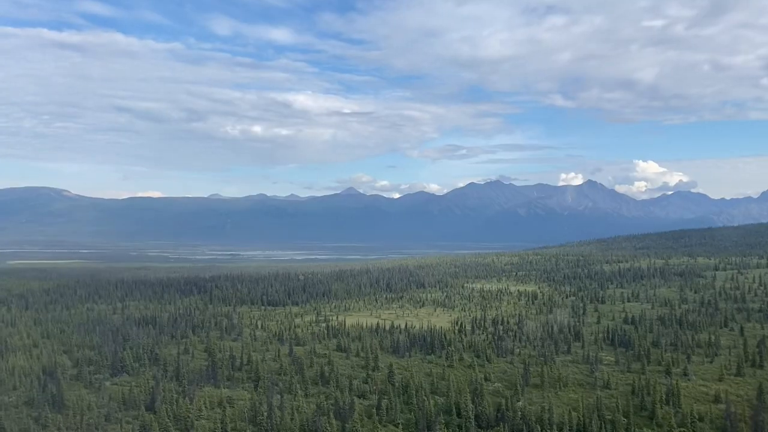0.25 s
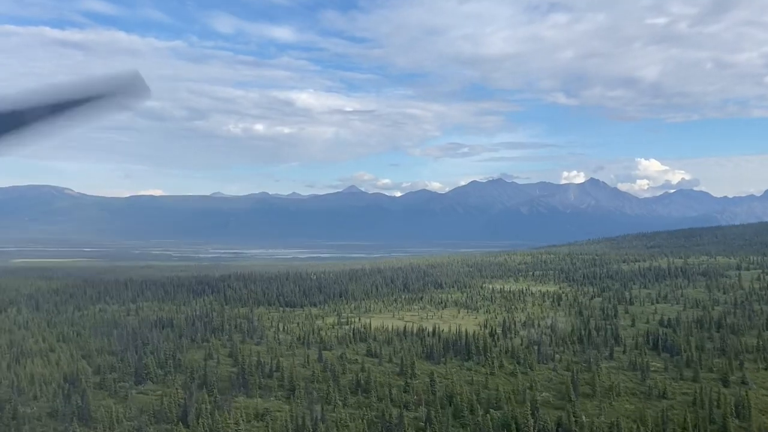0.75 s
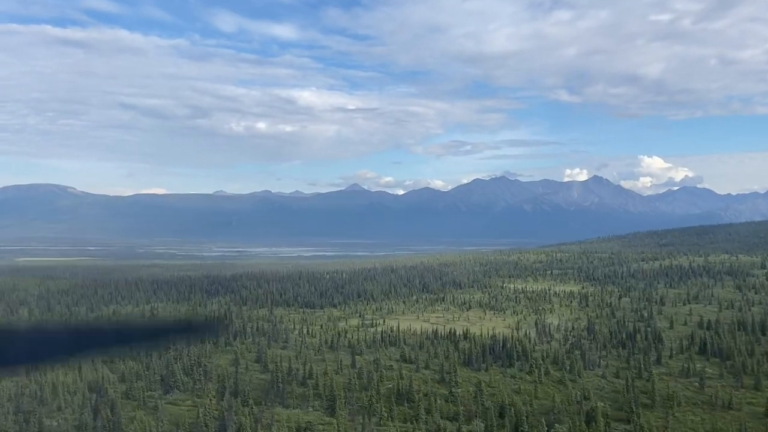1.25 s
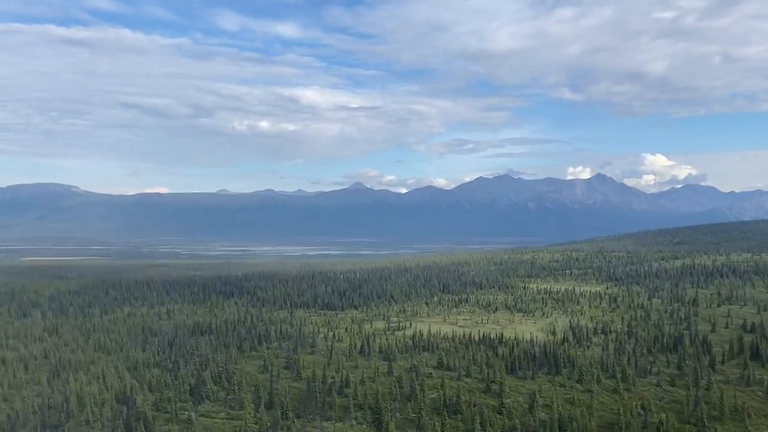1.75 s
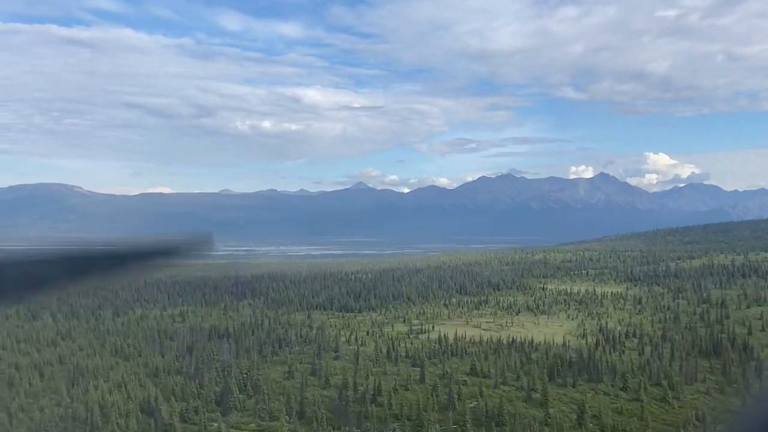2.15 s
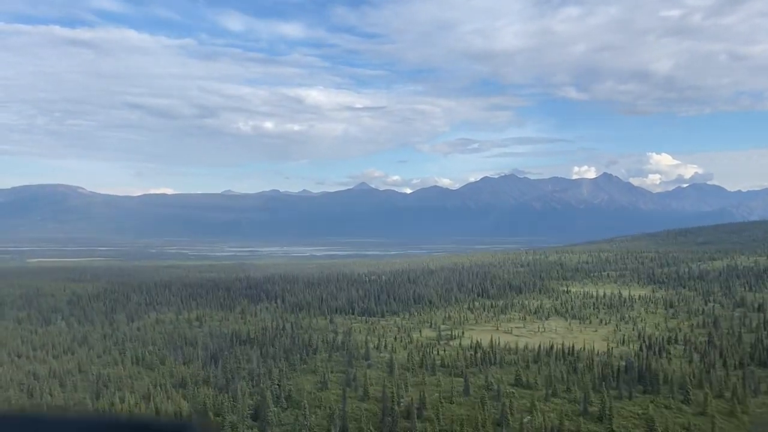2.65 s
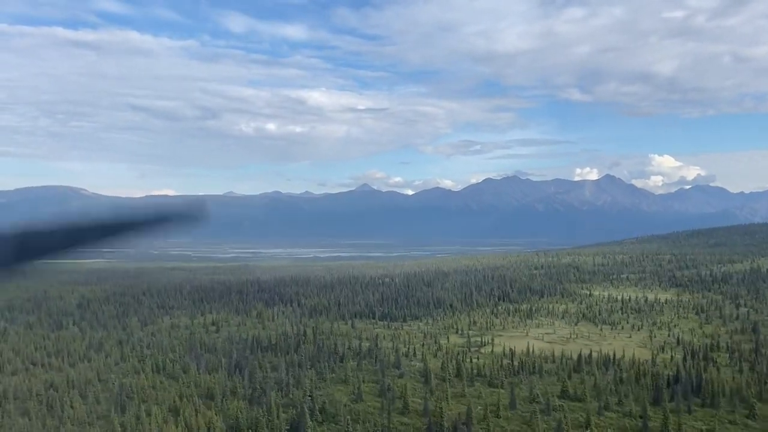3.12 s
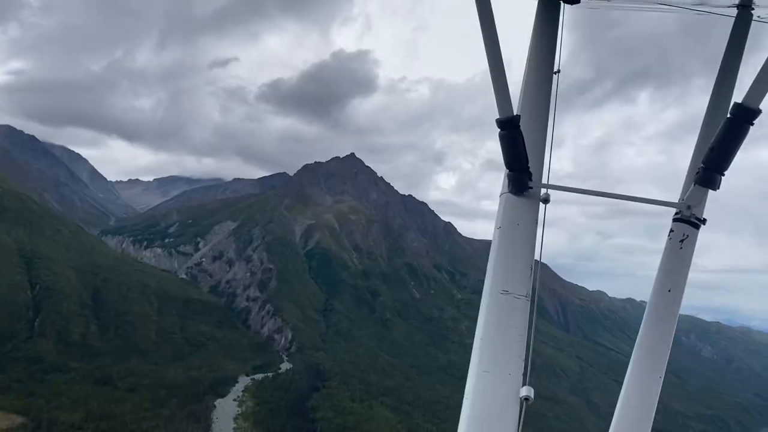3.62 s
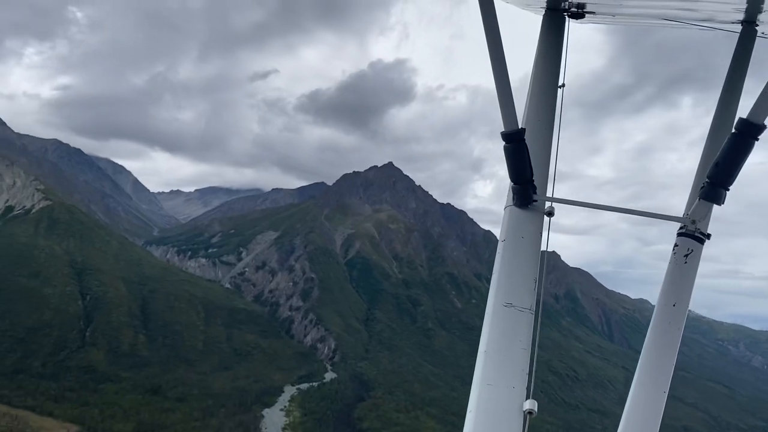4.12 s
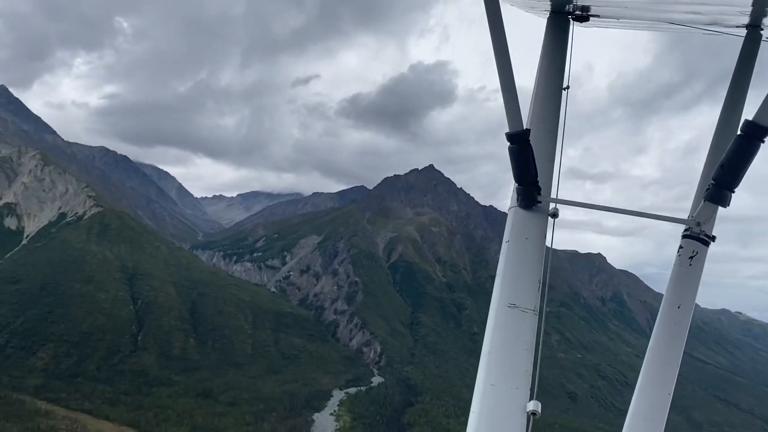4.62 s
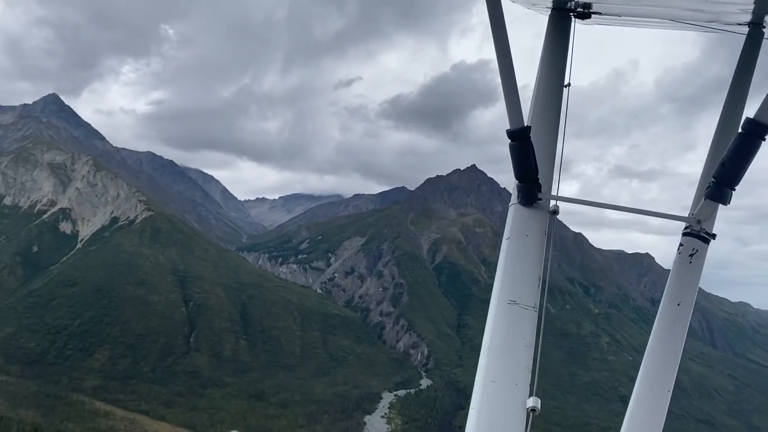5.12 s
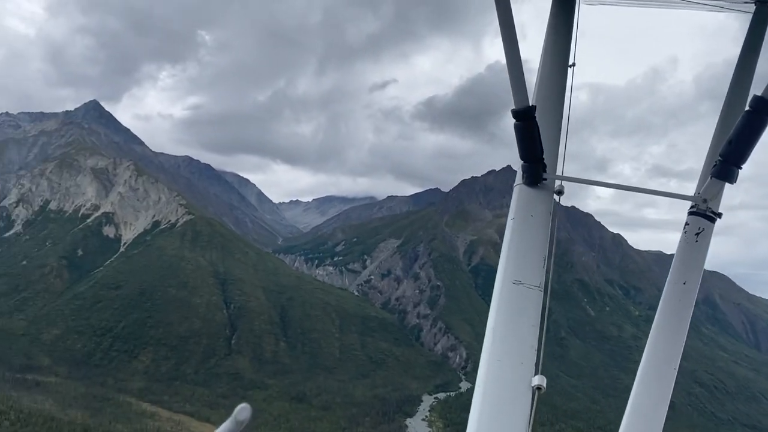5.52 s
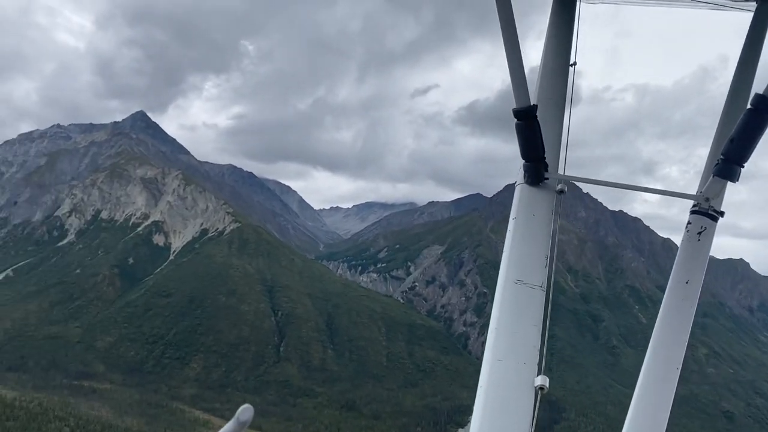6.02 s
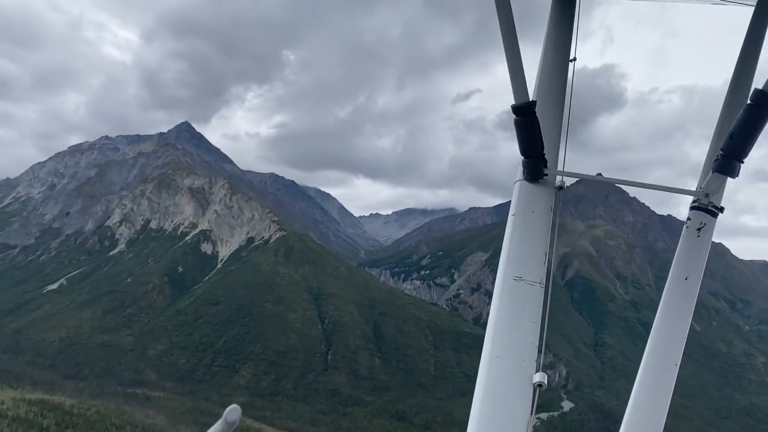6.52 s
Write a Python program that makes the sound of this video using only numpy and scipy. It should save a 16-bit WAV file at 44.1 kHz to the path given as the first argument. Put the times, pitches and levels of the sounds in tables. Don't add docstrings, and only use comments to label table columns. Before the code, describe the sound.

A continuous low propeller-engine drone, throbbing with rapid firings, fills a small cabin with air rush. After about three and a half seconds a sudden cut brings another position, with less deep hum, more beating midrange noise and fine rapid rattling at the top. Uneven sharp ticks follow, plus a single short deep boom on the hull. Stereo microphone inside, near the wall.

```python
import sys
import numpy as np
from scipy import signal
from scipy.fft import irfft
from scipy.io import wavfile
from scipy.ndimage import uniform_filter1d, minimum_filter1d, map_coordinates

SR = 44100
rng = np.random.default_rng(int(sys.argv[2]) if len(sys.argv) > 2 else 0)


def bounce(signal):
    frames = np.transpose(np.atleast_2d(signal))
    limited = np.clip(frames, -1, 1)
    pcm = np.round(limited * 32767).astype(np.int16)
    wavfile.write(sys.argv[1], SR, pcm)


def amplitude_ratio(level_db):
    exponent = np.asarray(level_db, float) / 20
    return 10 ** exponent


N = 298557
TIME = np.arange(N) / SR
FRAME = 1024
FRAME_HZ = np.arange(FRAME + 1) * SR / 2 / FRAME


def drift(rate_hz, size):
    memory = np.exp(-2 * np.pi * rate_hz * FRAME / SR)
    slow = signal.lfilter([1], [1, -memory], rng.standard_normal(N // FRAME + 102))[100:]
    slow = slow / slow.std()
    return np.interp(np.linspace(0, len(slow) - 1, size), np.arange(len(slow)), slow)


# time in seconds, pace in cycles per second.
FRONT_SPEED = [(0, 19.203), (.6, 19.167), (1.8, 19.087), (2.3, 19.104), (3.5, 19.074)]
SIDE_SPEED = [(3.4, 19.811), (4.9, 19.818), (5.3, 19.856), (5.9, 19.865), (6.3, 19.82), (6.77, 19.78)]


def cycles(speed, zero_s):
    turned = np.cumsum(np.interp(TIME, *np.transpose(speed))) / SR
    return turned - np.interp(zero_s, TIME, turned)


# frequency in Hz, level in dB per Hz.
FRONT_AIR = [(25.0, -37), (40.0, 0.5), (62.0, 1), (110.0, -3.5), (200.0, -7.5), (330.0, -11),
             (470.0, -11.5), (800.0, -20.5), (1300.0, -23), (2200.0, -32.5), (3500.0, -37), (6000.0, -38),
             (10000.0, -43), (15500.0, -47.5)]
SIDE_AIR = [(25, -30), (40, -5.5), (62, 6), (110, -4), (200, -14), (330, -12.5), (470, -19.5), (800, -24.5),
            (1300, -25.5), (2200, -34), (3500, -34.5), (6000, -40.5), (11000, -43), (15500, -40.5)]
# resonance in Hz, width in Hz, lift in dB.
FRONT_PANELS = [(351, 95, 5), (481, 46, -14), (560, 36, 2), (757, 48, -5), (854, 27, 6.5),
                (1037, 110, -4.5), (1240, 44, 6.5), (1460, 93, -1.5), (1540, 36, -2), (1767, 57, 3),
                (1664, 52, 5), (2000, 260, 2.5), (2885, 94, 6.5), (3770, 550, 5.5)]
SIDE_PANELS = [(308, 46, -9.5), (593, 63, 6), (1060, 75, 3.5), (1137, 87, -6.5), (1317, 120, 8),
               (1470, 200, -3), (1809, 53, 9), (1918, 65, 5.5), (2490, 100, 4.5), (2250, 60, 4),
               (2793, 63, 10), (3007, 110, 10)]


def colour_db(air, panels, hz):
    knots, levels_db = np.array(air).T
    smooth = np.interp(np.log(hz + 1), np.log(knots), levels_db)
    bells = (lift_db / (1 + (2 * (hz - mid_hz) / wide_hz) ** 2) for mid_hz, wide_hz, lift_db in panels)
    return smooth + sum(bells)


# order in multiples of the cycle rate, level in dB, left over right in dB.
FRONT_ORDERS = [(2, -43.4, 1.2), (3, -36.3, 1.5), (4, -22, 1.8), (5, -43.5, 2.3), (6, -43.6, .4),
                (7, -36.7, 2.2), (8, -36.3, 3.1), (9, -42.7, 5.8), (11, -37.5, 5.7), (12, -25.7, 6.7),
                (13, -34.8, 4.3), (16, -35, 2.5), (17, -40.5, 3.5), (20, -41.8, 3.2), (21, -38.3, 3.7)]
SIDE_ORDERS = [(3, -41.8, 3.6), (4, -33.7, 6.5), (7, -38.7, -.7), (8, -24.8, -1.6), (9, -34.1, -1.5),
               (11, -43.4, .5), (12, -36.8, -1.4), (13, -48.5, -5.5), (16, -48.5, -1), (20, -44.8, -3.5)]
# order in multiples of the cycle rate, level in dB, left over right in dB, left lead in radians.
FRONT_HUMS = [(27, -54, -12, 1.3), (28, -43.7, -5, .2), (31, -49, -15, -1.3), (32, -41.4, -12, -2.4),
              (33, -49, 3.6, 2.2), (35, -50, -8.6, -.6), (40, -54, -20, 2.7), (42, -46, 0, 2.6),
              (45, -45.8, -6, .8), (50, -52.3, -9, -.5), (64, -50, 4, .3), (68, -50.8, -1.4, -1.7),
              (78, -50.3, 3.4, -.3)]
SIDE_HUMS = [(24, -54, 7, 2.7), (25, -47.3, -5, 1), (26, -43.7, -.7, 2), (30, -46.4, 2, .7),
             (34, -50.3, 6.4, 1.4), (40, -53.7, 7.7, 1.3), (43, -53, 0, .8), (48, -58, 0, 1),
             (52, -53, 0, -.2), (62, -53.3, 8, .6), (64, -52, 0, .1), (68, -49.3, -5, .6),
             (95, -53.3, 0, .7)]


def drone(cycle, orders, air, panels, pair, faint_db, wobble_db, loudest, ringing):
    firing_lift_db, low_orders_db = 3, -10.5
    spread_db, lead_spread_rad = 3.0, 1.37
    cycle_hz = 19.5
    halves = np.array([.5, -.5])
    listed = {round(k): (db + pan_db / 2, db - pan_db / 2) for k, db, pan_db, *_ in orders}
    hum_leads = {round(row[0]): row[-1] for row in orders if len(row) > 3}
    knots, pans_db, _, leads = np.transpose(pair)
    lines = np.zeros((6, 2, 2049), complex)
    lag = 0
    for k in range(2, 170):
        high = k > 21
        chance = rng.standard_normal(4)
        pan_db = np.interp(np.log(k * cycle_hz), np.log(knots), pans_db)
        lead = np.interp(np.log(k * cycle_hz), np.log(knots), leads)
        faint = faint_db + colour_db(air, panels, k * cycle_hz) - np.clip(0.3 * (k - 95), 0, 8.0)
        faint += firing_lift_db * (k % 4 == 0) + low_orders_db * (not high)
        left, right = listed.get(k, faint + spread_db * chance[:2] + pan_db * halves)
        lead = hum_leads.get(k, lead + lead_spread_rad * chance[2] * high)
        lag += ringing * chance[3]
        if high:
            phase = lag - 2 * np.pi * k * loudest
        else:
            beside = (k + 2) % 4 - 2
            phase = 0.85 * chance[3] - 2 * np.pi * beside * loudest
        lines[k % 3 + 3 * high, :, k] = amplitude_ratio([left, right]) * np.exp(1j * (phase + lead * halves))
    shapes = irfft(lines * np.sqrt(2) * 2048) * amplitude_ratio(.8)
    steps = np.arange(4096) / 4096
    total = 0
    for n, shape in enumerate(shapes):
        swell = amplitude_ratio(wobble_db * (1 + 2.6 * (n > 2)) * drift(2.1, N))
        total = total + swell * np.array([np.interp(cycle, steps, side, period=1) for side in shape])
    return total


def pulses(cycle, strengths_db, sharp):
    stroke = cycle * len(strengths_db) + .5
    strength = amplitude_ratio(np.asarray(strengths_db)[stroke.astype(int) % len(strengths_db)])
    return strength * abs(np.sin(np.pi * stroke)) ** sharp


# frequency in Hz, left over right in dB, likeness from 0 to 1, left lead in radians.
FRONT_PAIR = [(60, 1.7, .99, .1), (210, 3.3, .93, .1), (450, .7, .3, .2), (650, -5.5, .44, -1.7),
              (900, -2.6, .5, 2.1), (1300, .6, .59, -1.3), (1900, .9, .41, 1.5), (3000, -2.1, .43, -.5)]
SIDE_PAIR = [(40, -1.8, .79, .8), (65, 0, .8, 1.5), (110, -2.5, .35, 1.4), (170, -4.6, .18, .1),
             (400, 0, .07, .3), (650, 1.8, .57, .9), (1800, -2, .58, 1.2), (3200, 1.7, .53, -.3)]
# lower edge in Hz, upper edge in Hz, share
FRONT_TWINS = [(8130, 9970, -1), (10900, 13400, 0.92), (14300, 17000, -1)]
SIDE_TWINS = [(6500, 7500, 0.99), (8290, 9740, -1), (10350, 12250, 1), (12400, 13800, -1),
              (14700, 17000, 0.91)]


def both_sides(gate, level_db, pair, twins, patchy_db, wander_hz):
    noise = rng.standard_normal((2, N)) * gate
    hz, s, (own, other) = signal.stft(noise, SR, "cosine", 2 * FRAME)
    knots, *columns = np.transpose(pair)
    pan_db, alike, lead = (np.interp(np.log(hz + 1), np.log(knots), c)[:, None] for c in columns)
    share = alike * np.exp(-1j * lead) * (hz[:, None] < 7000) + 0 * s
    twin = np.zeros(share.shape, bool)
    for low, high, sign in twins:
        low = low + wander_hz * np.round(0.54 * drift(4.0, len(s)))
        high = high + wander_hz * np.round(0.54 * drift(4.0, len(s)))
        inside = (hz[:, None] > low) & (hz[:, None] < high)
        share = np.where(inside, sign, share)
        twin = twin | inside
    bands = np.array([drift(9.1, len(s)) for _ in range(12)])
    places = np.meshgrid(np.log2(hz / 20 + 1), np.arange(len(s)), indexing="ij")
    patches = map_coordinates(bands, places, order=1)
    gain = amplitude_ratio(level_db[:, None] + patchy_db * patches * (hz[:, None] / 100 + 1) ** -.4)
    ripple = uniform_filter1d(rng.standard_normal((2, len(hz))), size=3) * ((hz > 450) & (hz < 3300))
    gain = gain * amplitude_ratio(1.3 * ripple[:, :, None])
    tilt = amplitude_ratio(np.where(twin, 0, pan_db / 2))
    left = own * tilt
    right = (share * own + np.sqrt(abs(1 - abs(share) ** 2)) * other) / tilt
    return signal.istft(np.array([left, right]) * gain, SR, "cosine", 2 * FRAME)[1][:, :N]


FRONT_FIRINGS = [0, -7, -2.5, -7]
SIDE_FIRINGS = [0, -6, -4, -8]


def slipstream(cycle, air, pair, panels, twins, firings, air_db, knock_db, patchy_db, wander_hz):
    level_db = colour_db(air, panels, FRAME_HZ) + air_db
    steady = both_sides(0.88, level_db, pair, twins, patchy_db, wander_hz)
    mids_db = knock_db - 19.0 * np.log2((FRAME_HZ + 1) / 1000) ** 2
    beats = pulses(cycle, firings, sharp=2.1)
    return steady + both_sides(beats, level_db + mids_db, pair, [], patchy_db, wander_hz)


# time in seconds, peak level in dB.
HARD_TICKS = [(4.1254, -44), (4.3265, -24), (4.4776, -37), (4.6557, -20), (5.0079, -29), (5.2848, -32),
              (5.3865, -38), (5.5123, -29), (5.662, -20), (5.8645, -33), (5.9647, -27), (6.0401, -24),
              (6.1154, -38), (6.317, -19)]


def fitting(cycle, tick_db, hard_db, uneven_db):
    turn = np.floor(2 * cycle + .5).astype(int)
    strength = amplitude_ratio(uneven_db * rng.standard_normal(N // 500))[turn - turn.min()]
    hits = sum(amplitude_ratio(db) * np.exp(-.5 * ((TIME - s - .002) / 0.00072) ** 2) for s, db in HARD_TICKS)
    octaves = np.log2(np.clip(FRAME_HZ, 100, None) / 15500)
    gate = strength * pulses(cycle, [0, -.5], sharp=23.0)
    ticks = both_sides(gate, tick_db + 22 * octaves, SIDE_PAIR, SIDE_TWINS, 0, 120)
    hard_colour_db = hard_db - 40 * (octaves + 0.39) ** 2
    return ticks + both_sides(hits, hard_colour_db, SIDE_PAIR, SIDE_TWINS[::2], 0, 120)


# time in seconds, ring in Hz, width in seconds, peak level in dB.
THUMP = [
    (5.386, 78.6, 0.015, -13.5),
    (5.4, 338, 0.0038, -21),
]


def thump():
    total = 0
    for s, hz, wide_s, db in THUMP:
        swell = amplitude_ratio(db) * np.exp(-.5 * ((TIME - s) / wide_s) ** 2)
        total = total + swell * np.cos(2 * np.pi * hz * (TIME - s) + 2.1)
    return total


# fade start in seconds, fade end in seconds.
FADE = [
    3.4,
    3.428,
]


def scene():
    cycle, loudest = cycles(FRONT_SPEED, zero_s=.268), .35
    front = drone(cycle, FRONT_ORDERS + FRONT_HUMS, FRONT_AIR, FRONT_PANELS, FRONT_PAIR,
                  faint_db=-35.0, wobble_db=0.43, loudest=loudest, ringing=1.2)
    front += slipstream(cycle - loudest, FRONT_AIR, FRONT_PAIR, FRONT_PANELS, FRONT_TWINS, FRONT_FIRINGS,
                        air_db=-1.0, knock_db=-1.0, patchy_db=1.0, wander_hz=304)
    cycle, loudest = cycles(SIDE_SPEED, zero_s=4.127), .53
    side = drone(cycle, SIDE_ORDERS + SIDE_HUMS, SIDE_AIR, SIDE_PANELS, SIDE_PAIR,
                 faint_db=-33.0, wobble_db=0.2, loudest=loudest, ringing=1.25)
    side += slipstream(cycle - loudest, SIDE_AIR, SIDE_PAIR, SIDE_PANELS, SIDE_TWINS, SIDE_FIRINGS,
                       air_db=-1.5, knock_db=3.5, patchy_db=3.5, wander_hz=300)
    side += fitting(cycle, tick_db=-34, hard_db=-9, uneven_db=3.5) + thump()
    mix = np.interp(TIME, FADE, [0, np.pi / 2])
    return front * np.cos(mix) + side * np.sin(mix)


def band_limit(x):
    return signal.sosfilt(signal.butter(12, 16960, fs=SR, output="sos"), x)


def record(dry):
    heard = signal.sosfilt(signal.butter(2, 36, "high", fs=SR, output="sos"), dry)
    ceiling = .4
    over_db = np.maximum(20 * np.log10(abs(heard).max(axis=0) / ceiling + 1e-9), 0)
    held_db = -minimum_filter1d(-over_db, size=401)
    held = heard * amplitude_ratio(-uniform_filter1d(held_db, size=301))
    mix = signal.sosfilt(signal.ellip(12, .3, 80, 15780, fs=SR, output="sos"), held)
    return band_limit(mix)


dry = scene()
out = record(dry)
bounce(out)
```